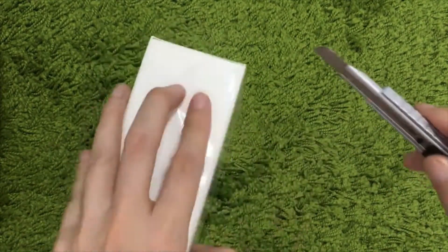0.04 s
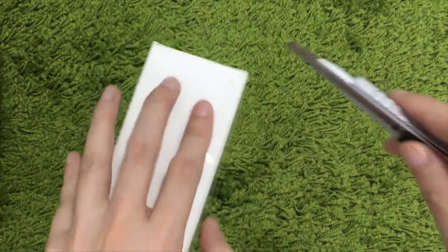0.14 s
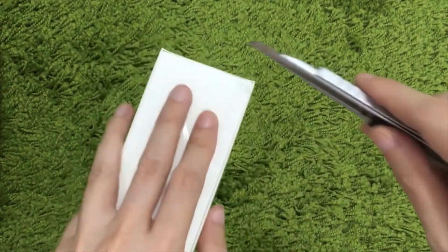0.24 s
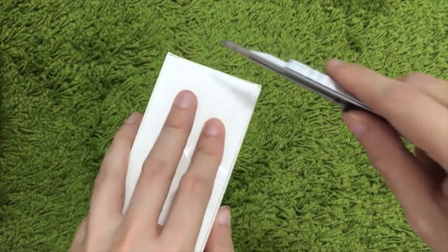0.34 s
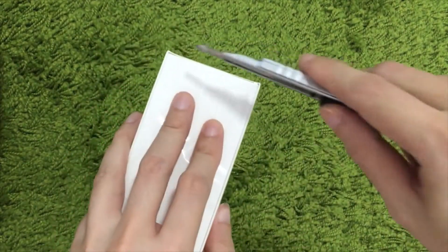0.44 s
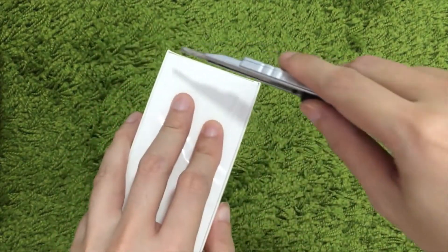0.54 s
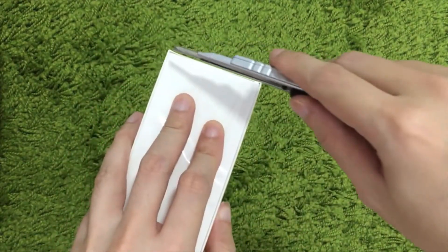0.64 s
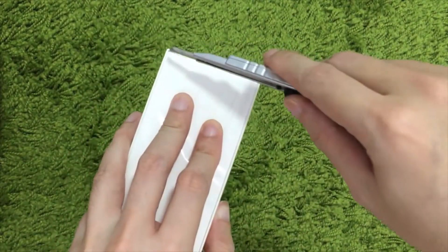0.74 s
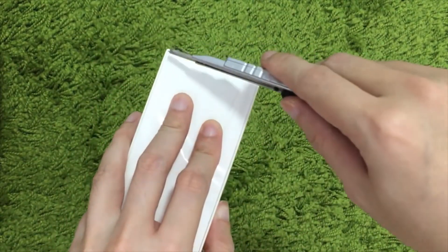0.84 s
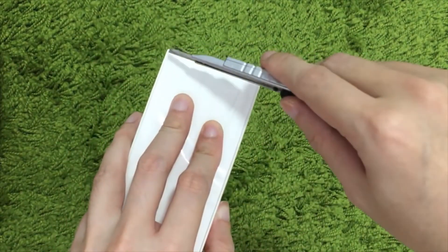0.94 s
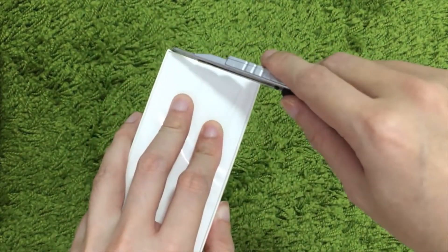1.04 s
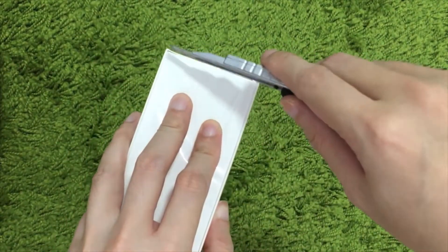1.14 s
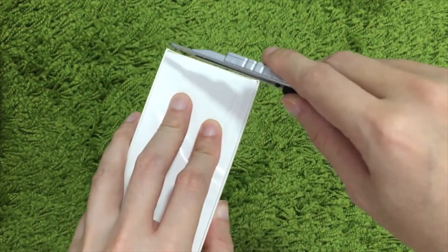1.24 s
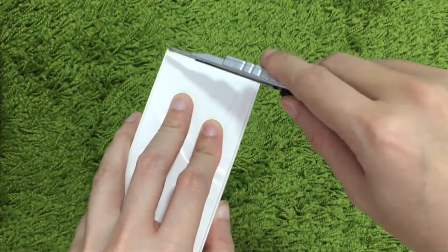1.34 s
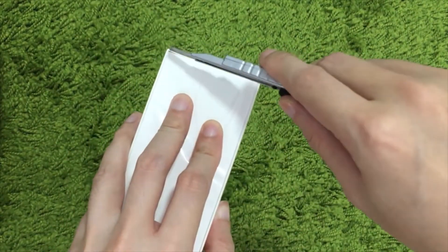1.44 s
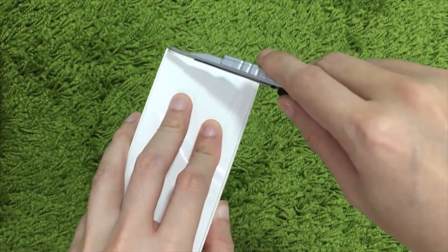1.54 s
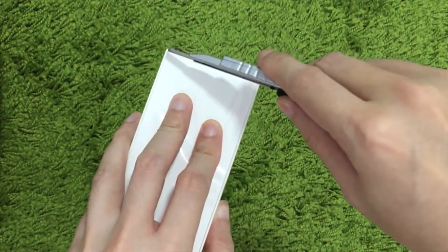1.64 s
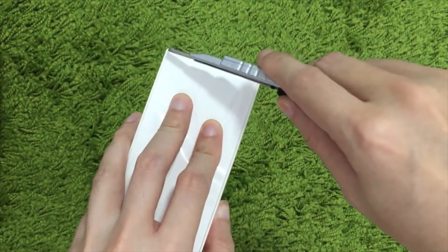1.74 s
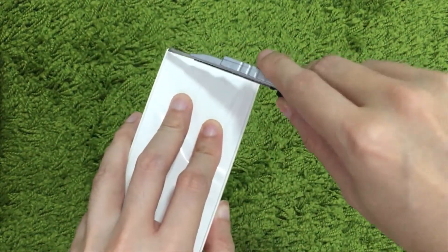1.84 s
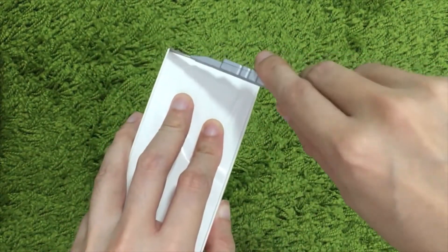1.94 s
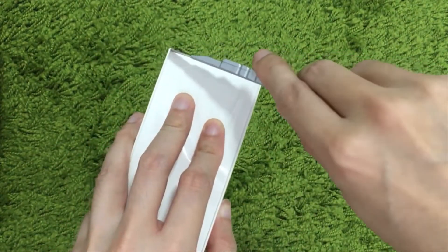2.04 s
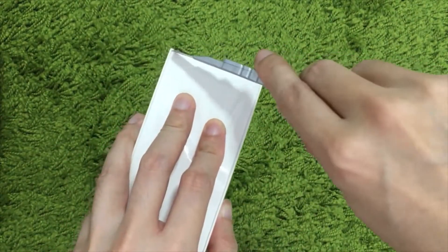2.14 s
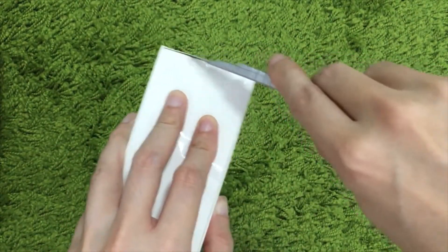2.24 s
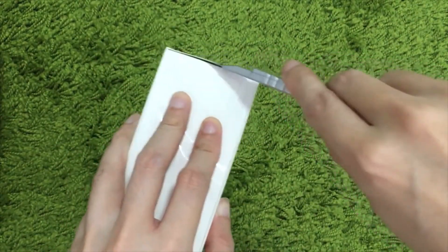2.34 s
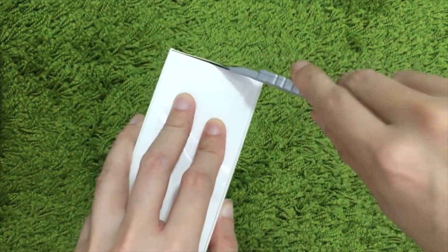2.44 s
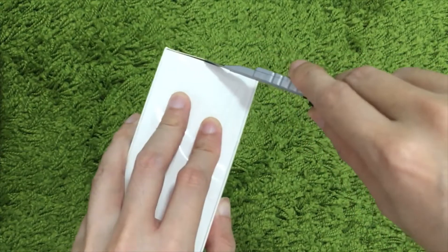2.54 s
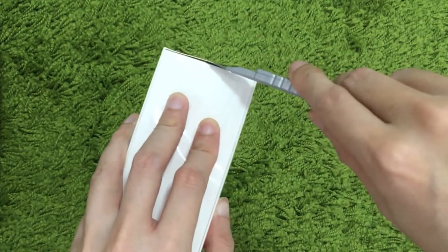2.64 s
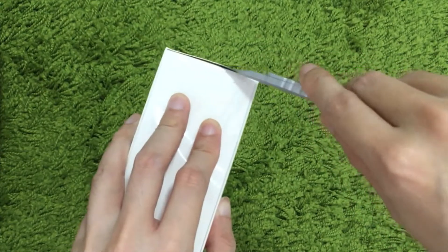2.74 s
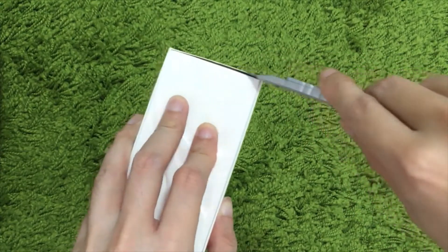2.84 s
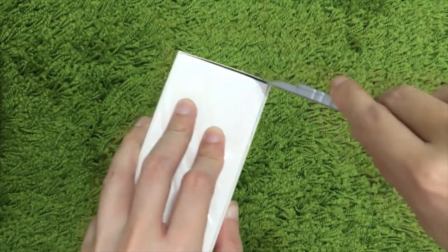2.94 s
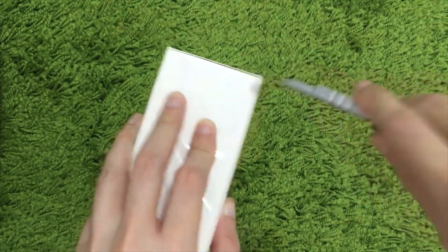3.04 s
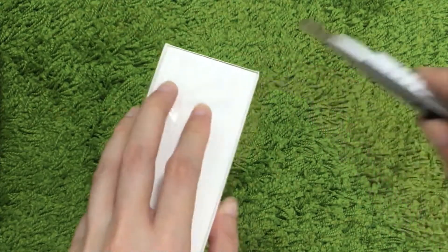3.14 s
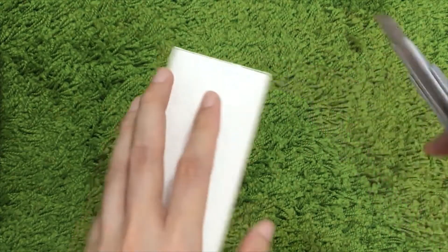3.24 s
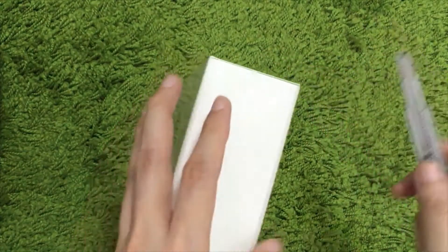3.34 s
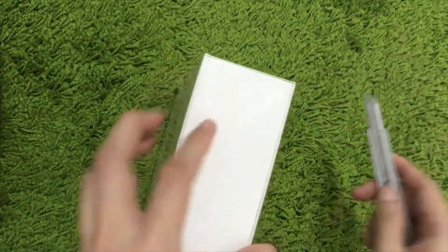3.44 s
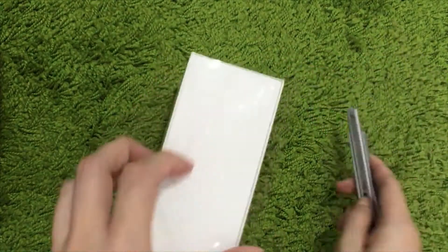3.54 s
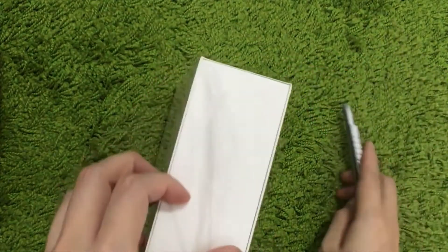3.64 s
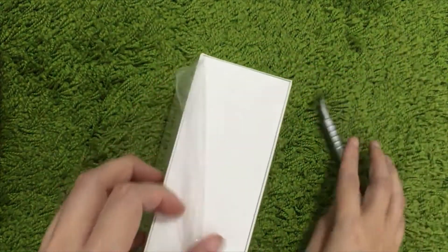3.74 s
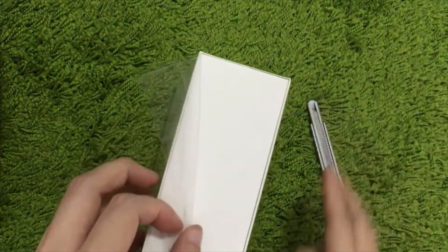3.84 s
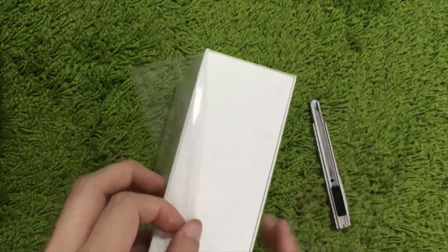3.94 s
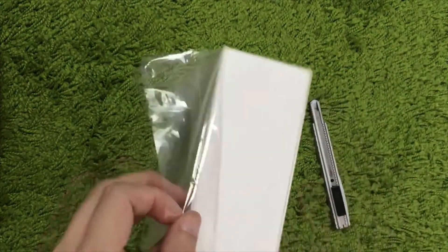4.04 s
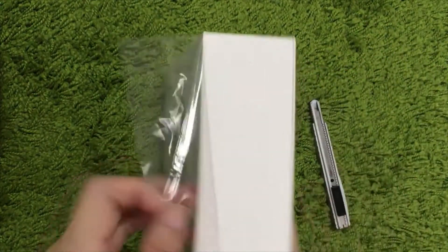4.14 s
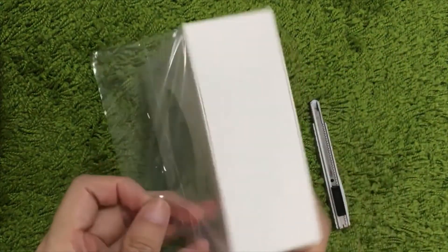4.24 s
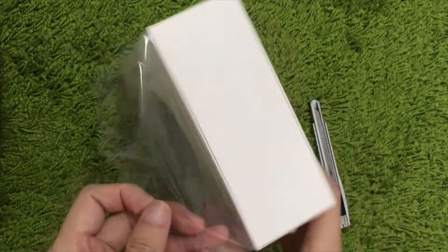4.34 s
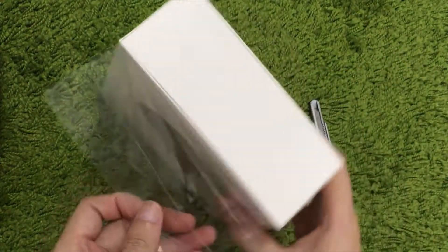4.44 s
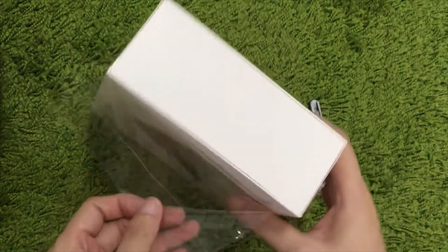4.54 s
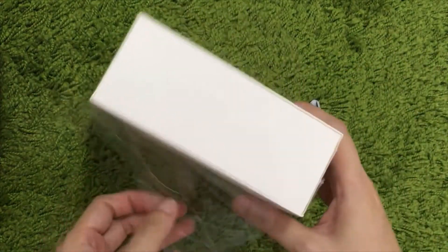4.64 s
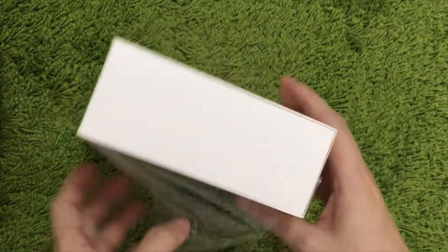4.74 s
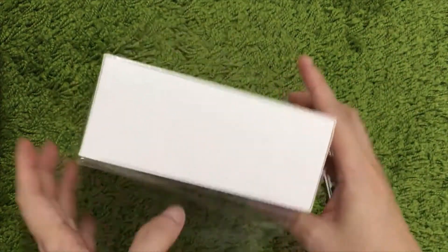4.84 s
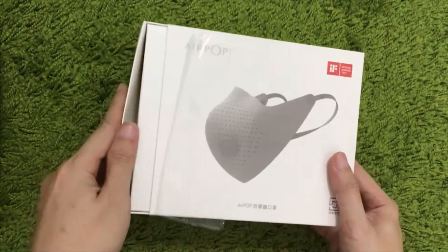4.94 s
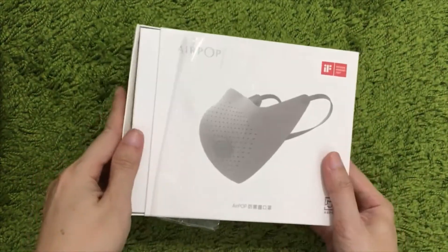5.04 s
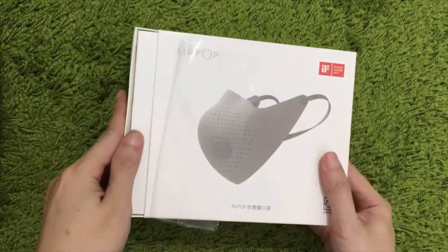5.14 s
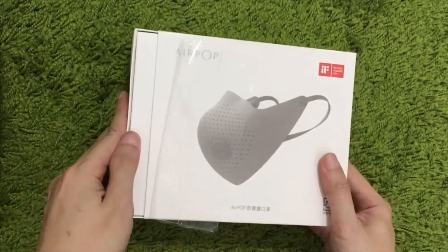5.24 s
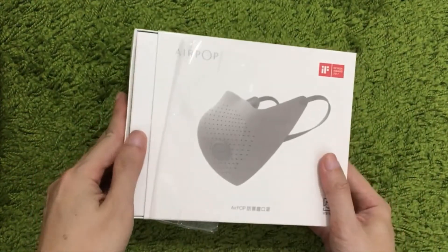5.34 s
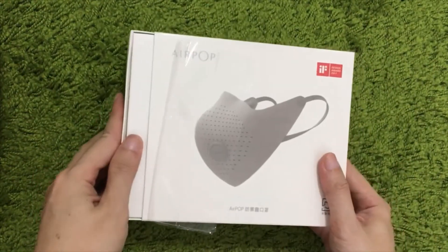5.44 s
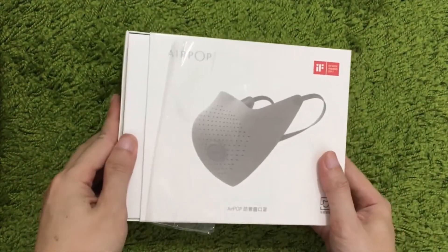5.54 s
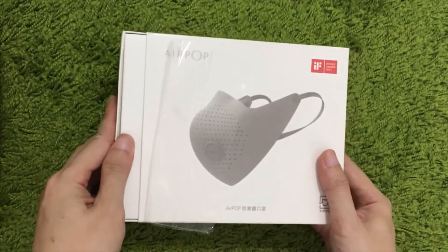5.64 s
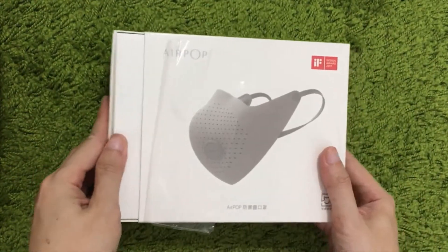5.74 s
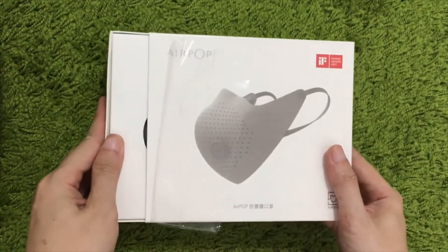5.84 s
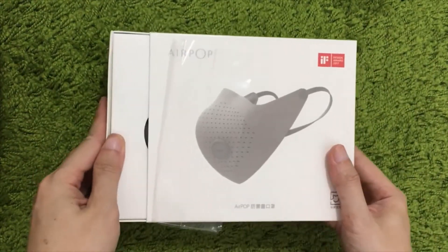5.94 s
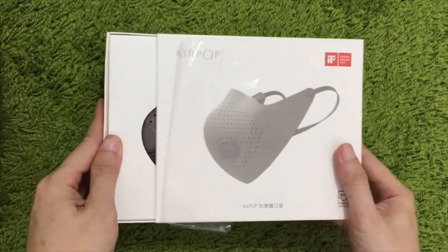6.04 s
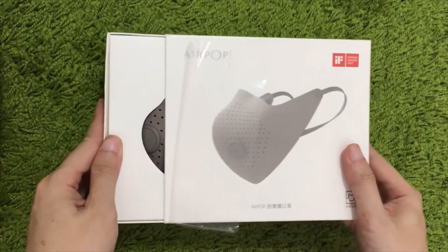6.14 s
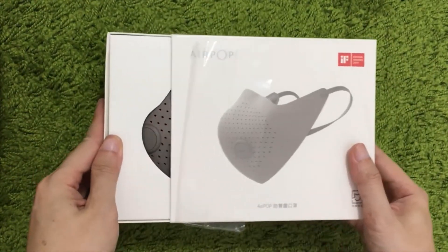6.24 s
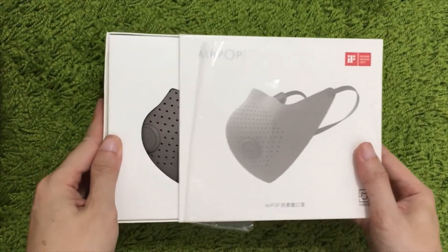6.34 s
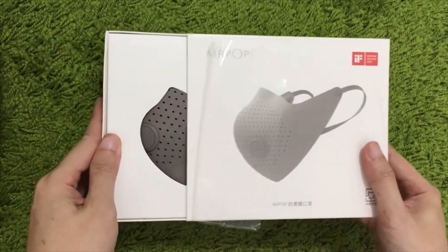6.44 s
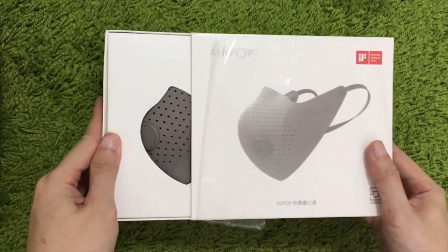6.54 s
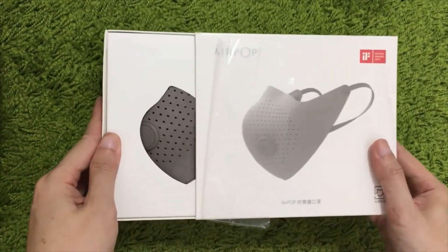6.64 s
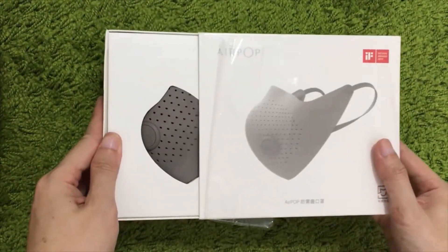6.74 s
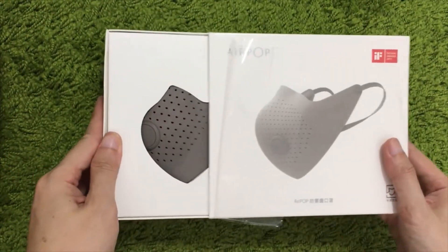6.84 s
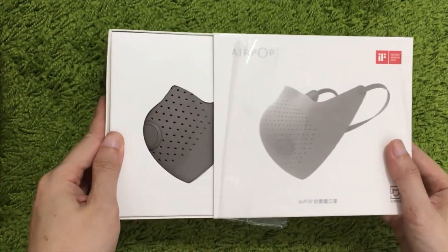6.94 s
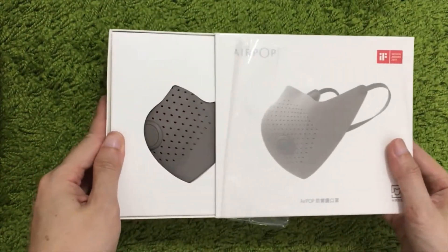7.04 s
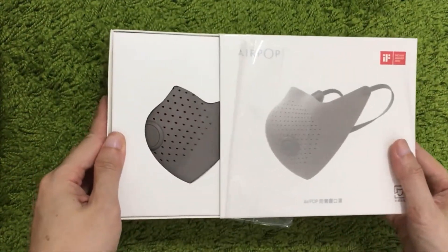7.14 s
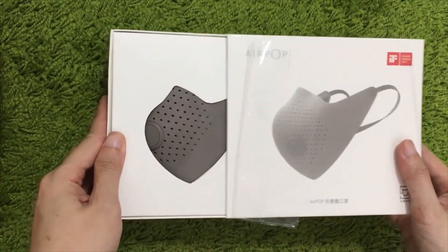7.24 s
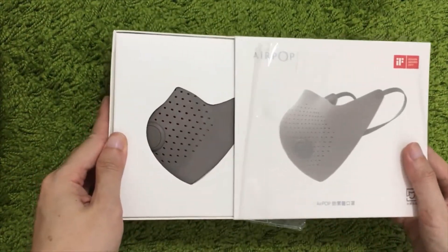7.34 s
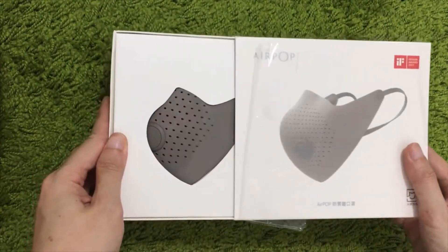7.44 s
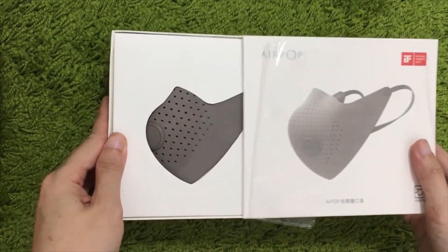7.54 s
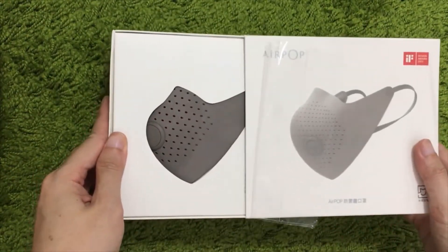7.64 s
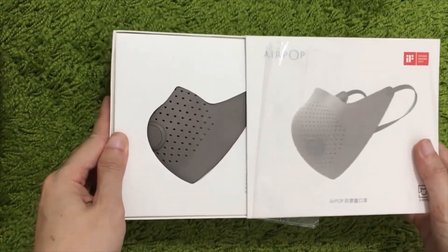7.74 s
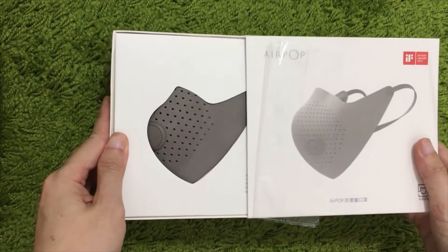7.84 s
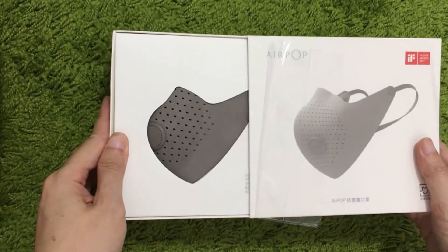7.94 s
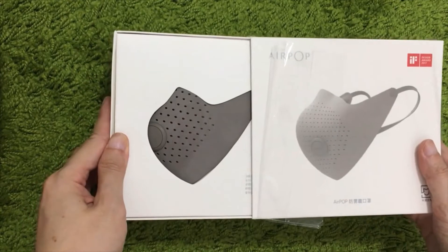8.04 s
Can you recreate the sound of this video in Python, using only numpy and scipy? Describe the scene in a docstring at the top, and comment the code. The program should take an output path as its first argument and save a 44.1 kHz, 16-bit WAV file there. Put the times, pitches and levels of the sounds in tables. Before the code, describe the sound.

A utility knife slits plastic wrap on a small box, its blade ratchets sharply, film crackles off, and the card tray slides out in soft pulls.

```python
"""A crisp snap of plastic film over a dull box knock comes first: hands slit the shrink film of a small card box
with a snap-blade knife, ratchet the blade back, peel the film and slide the tray out in short pulls,
on a rug in a quiet room. Traffic rumble, a motor hum, a low tone and two bird chirps come in from outside.
Clicks, snaps and knocks are noise bursts driving damped modes; rubbing and sliding are shaped noise;
squeaks and rasps are narrow noise; bird, motor and low tone are sines."""
import sys
import numpy as np
from scipy import signal
from scipy.fft import rfft, irfft, next_fast_len
from scipy.io import wavfile

SR = 44100
rng = np.random.default_rng(int(sys.argv[2]) if len(sys.argv) > 2 else 0)


def attenuation_scalar(level_db):
    """Turn a level in dB into a linear amplitude multiplier (20 dB per decade)."""
    decades = np.asarray(level_db, float) / 20
    return 10 ** decades


def transcribe(u):
    """Save the signal u as a 16-bit wav file named by the first command-line argument.

    u: samples, shape (n,) or (channels, n), limited to [-1, 1]; the rate is SR.
    q: integer samples, one column per channel.
    """
    v = np.clip(np.atleast_2d(u).T, -1, 1)
    q = np.round(v * 32767).astype(np.int16)
    wavfile.write(sys.argv[1], SR, q)


N = 356769  # length of the scene [samples]


# clicks of the knife's slider and blade: (time [s], shell peak level [dB], favoured ring [Hz])
KNIFE_CLICKS = [(0.9715, -34.5, 2760), (1.0994, -48, 2190), (1.8462, -40.5, 4500), (1.8636, -61, 2720),
                (1.9099, -30.5, 3900), (1.9386, -49, 4360), (2.4013, -50.5, 3220), (2.5243, -53, 4390),
                (2.549, -53, 2560), (3.0105, -32.5, 2750), (3.259, -47.5, 6070), (3.3905, -16, 5470),
                (3.3992, -16.5, 2750), (3.409, -17, 5880), (3.4179, -14, 2700), (3.4268, -13, 6990),
                (3.4357, -15, 6050), (3.4487, -16.5, 2724), (3.472, -15.5, 5800), (3.4959, -17.5, 5900),
                (3.512, -16, 6400), (3.69, -30.5, 2300)]
# ringing of the knife's shell: (frequency [Hz], relative level [dB], T60 [s])
SHELL_MODES = [(2200, -17.5, 0.017), (2755, -1.5, .016), (3180, -3, 0.021), (3900, -5, 0.003),
               (4540, 3.5, 0.0086), (5280, -0.5, 0.0046), (5500, -3.5, 0.01), (5800, 0.5, 0.016),
               (6290, -10, .007), (6400, -15, 0.0077)]
# ringing of the blade: (frequency [Hz], gain on the tick [dB], T60 [s])
BLADE_MODES = [(8900, -16.5, .005), (9500, -15, .005), (11600, -12.5, .004), (13300, -10, .006),
               (14700, -11.5, .004)]
# harder clicks are brighter and shorter; TICK_DB and RATTLE_MS hold for a click of -16 dB
TICK_DB, TICK_PER_DB = -13.5, 1.84
RATTLE_MS, RATTLE_MS_PER_DB = 0.59, -0.04


def knife():
    """Each detent rattles briefly: the shell's damped modes ring under a dry bright tick of the blade."""
    out = np.zeros(N)
    rattles = clusters(len(KNIFE_CLICKS), spiky_db=3.5)
    strengths = rng.normal(0, 2.0, (len(KNIFE_CLICKS), len(SHELL_MODES)))
    for (s, shell_db, centre_hz), rattle, own_db in zip(KNIFE_CLICKS, rattles, strengths):
        harder_db = shell_db + 16
        blow = rattle * fade(RATTLE_MS + RATTLE_MS_PER_DB * harder_db)
        rung = 0
        for (hz, db, t60), chance_db in zip(SHELL_MODES, own_db):
            mode_db = db + chance_db + favour(hz, centre_hz, lift_db=13.0)
            rung = rung + attenuation_scalar(mode_db) * rms_one(ring(blow, hz, t60))
        shell = band(rung + attenuation_scalar(3.0) * rms_one(blow), 1800, 7000)
        add(out, s, band(shell, 1800, 16500), shell_db)

        tick = band(blow, 7000, 16500)
        blade = sum(attenuation_scalar(db) * ring(tick, hz, t60) for hz, db, t60 in BLADE_MODES)
        add(out, s, tick + blade, TICK_DB + TICK_PER_DB * harder_db)
    return out


# faint squeaks and rasps of blade and card: (start [s], end [s], frequency [Hz], level at the middle [dB])
SQUEAKS_AND_RASPS = [(0.324, .47, 3170, -76.5), (1.79, 1.923, 6330, -73.5), (2.39, 2.438, 5500, -71),
                     (2.46, 2.513, 5470, -76), (2.583, 2.68, 6270, -73), (2.693, 2.772, 1810, -59),
                     (2.677, 2.774, 3220, -66), (2.78, 2.87, 5550, -68), (3.608, 3.7, 1190, -63),
                     (5.987, 6.028, 3280, -57)]


def squeaks_and_rasps():
    """Blade and card squeak and rasp faintly: noise twice through a narrow resonance."""
    out, t, white = np.zeros(N), np.arange(N) / SR, rng.standard_normal(N)
    for start, end, hz, db in SQUEAKS_AND_RASPS:
        swell = np.sin(np.pi * np.clip((t - start) / (end - start), 0, 1))
        once = ring(white, hz, .006)
        out += attenuation_scalar(db) * swell * rms_one(ring(once, hz, .006))
    return out


# single snaps of the film, and ticks of the card once the tray slides:
# (time [s], peak level of the bright part [dB], card-coloured low part relative to it [dB], brightness [Hz])
TIMED_SNAPS = [(0.0165, -24, -4.5, 5950), (0.0882, -39.5, -5.5, 15500), (0.2092, -34.5, -36, 14500),
               (0.2466, -43.5, -11, 8640), (2.156, -41, -22, 14800), (2.166, -35, -15, 15100),
               (2.1924, -22.5, -14, 5900), (2.1965, -25.5, -7.5, 11600), (2.2268, -28, -12, 12800),
               (2.2284, -30, -3, 4310), (2.2377, -25, -6, 12200), (2.2426, -36.5, 7.5, 6380),
               (2.7087, -44, -12, 5940), (2.7272, -54, -8, 5990), (2.7444, -56, -12, 5970),
               (2.7548, -43, -1, 6580), (2.7795, -13, -11.5, 5800), (2.8325, -34.5, -31, 14700),
               (2.9964, -46, 3, 15200), (3.0244, -35, -21, 12400), (3.04, -35, -28, 12800),
               (3.0779, -28.5, -34, 13600), (3.0924, -35, -30, 14500), (3.115, -40, -26, 14900),
               (3.1384, -34, -30, 14100), (3.1647, -32, -10, 11100), (3.1714, -44, -10, 11400),
               (3.2055, -32.5, -11, 13300), (3.2222, -30.5, -11.5, 11700), (3.307, -43.5, -10, 15400),
               (3.329, -35, -8.5, 8280), (3.3587, -47.5, -3, 9310), (3.5759, -14, -36, 13800),
               (3.6556, -38, -9, 6330), (3.6949, -19, -21, 15700), (3.7237, -23.5, -17, 8610),
               (3.7346, -16.5, -20.5, 9150), (3.806, -23, -31, 8100), (3.8162, -27, -28, 6990),
               (3.906, -28.5, -22, 6410), (3.9345, -27, -19, 6480), (3.956, -23, -17, 4120),
               (3.9657, -30.5, -10, 12300), (3.9711, -18.5, -12.5, 13400), (3.9814, -12, -13.5, 12000),
               (4.0024, -33.5, -2, 6060), (4.0372, -39, -6, 5730), (4.0978, -27, -28, 15100),
               (4.1128, -9, -11.5, 9700), (4.1224, -25, -7, 8270), (4.14, -25, -16, 9430),
               (4.162, -23, -21, 12100), (4.2247, -42, 1, 5750), (4.2463, -30, -7, 9290),
               (4.2782, -35, -8, 5710), (4.3008, -27.5, -4.5, 9010), (4.3141, -27, -13, 8020),
               (4.3314, -17.5, -14.5, 5620), (4.3404, -39, -26, 14700), (4.353, -25, -19, 14700),
               (4.3799, -22.5, -31, 15400), (4.385, -36, -23, 9840), (4.4097, -36.5, -12, 6640),
               (4.4518, -56, -15, 13400), (4.4887, -43.5, 1, 4470), (4.6044, -39, -21, 4000),
               (4.6941, -26.5, -7, 5660), (4.756, -33, -8, 6540), (4.764, -46, -7, 15200),
               (4.776, -50, -11, 9390), (4.7884, -43, -14.5, 7170), (4.8269, -46.5, -7.5, 4230),
               (4.9434, -48, -3, 7160), (4.9714, -47.5, -2, 6150), (5.704, -37.5, -4.5, 4010),
               (5.7289, -33.5, -7, 5690), (5.9553, -39, -14.5, 12500), (7.6011, -42, -18.5, 15100),
               (7.8156, -58, -4, 4430)]
# the card flap under the film rings: (frequency [Hz], level relative to the low part [dB], T60 [s])
FLAP_MODES = [(1894, -8.5, 0.0048), (3300, -3.5, 0.0035)]
SNAP_MS, SNAP_SPREAD = .5, .25  # typical length of a -30 dB snap, random spread of its natural log
SHORTER_PER_DB = .025  # louder snaps are briefer: drop in log length per dB
EVEN_HZ, TILT_DB_PER_OCTAVE = 8600, 9  # brightness at which both bright bands peak alike


def snaps_and_ticks():
    """Film creases and card let go in bursts of cracks; the low part of each lasts longer than the high."""
    snaps = list(TIMED_SNAPS) + random_snaps()
    out, cracks = np.zeros(N), clusters(len(snaps), spiky_db=10.5)
    above_db = np.array(snaps)[:, 1] + 30
    chance = SNAP_SPREAD * rng.standard_normal(len(snaps))
    lengths_ms = SNAP_MS * np.exp(chance - SHORTER_PER_DB * above_db)
    for (s, db, low_db, bright_hz), crack, ms in zip(snaps, cracks, lengths_ms):
        low = rms_one(band(crack * fade(3.85 * ms), 1500, 4000))
        flap = sum(attenuation_scalar(g) * rms_one(ring(low, hz, t60)) for hz, g, t60 in FLAP_MODES)
        add(out, s, low + flap, db + low_db)

        # a bright snap is weaker in its middle, a dull one in its top
        tilt_db = TILT_DB_PER_OCTAVE * np.log2(bright_hz / EVEN_HZ)
        burst = crack * fade(ms)
        add(out, s, band(burst, 5300, 10490), db - max(tilt_db, 0))
        add(out, s, band(burst, 9040, 15000), db + min(tilt_db, 0))
    return out


RANDOM_SNAPS = 45  # how many
SNAP_OVER_RUSTLE_DB = 8.5  # least peak above the crinkle gain
RANDOM_LOW_DB = -6.5  # average low part relative to the bright part


def random_snaps():
    """Further snaps at random times, the more often and the louder the louder the rustle is."""
    crinkle, draw = rubbing()[0], rng.random((RANDOM_SNAPS, 4))
    busy = np.cumsum(np.sqrt(crinkle))
    i = np.searchsorted(busy, draw[:, 0] * busy[-1])
    db = 20 * np.log10(crinkle[i] + 1e-9) + SNAP_OVER_RUSTLE_DB + 12 * draw[:, 1]
    low_db = RANDOM_LOW_DB + 16 * (draw[:, 2] - .5)
    bright_hz = EVEN_HZ * 2 ** (1.4 * (draw[:, 3] - .5))
    return list(zip(i / SR, db, low_db, bright_hz))


def rustle():
    """Rustling hiss with clumps of fine crackles in it; card scuffs low, film crinkles high."""
    sizes = attenuation_scalar(12.0 * np.minimum(rng.exponential(1, N), 4)) * rng.choice([-1, 1], N)
    per_second = 900 * attenuation_scalar(5.0 * drift(25))
    crackle = sizes * (rng.random(N) < per_second / SR)
    hiss = rng.standard_normal(N) * attenuation_scalar(2.5 * drift(36))
    grain = hiss + attenuation_scalar(-3.5) * rms_one(crackle)
    scuff = rms_one(band(grain, 330, 4200))
    crinkle = rms_one(band(grain, 7700, 19845))
    crinkle_gain, scuff_gain = rubbing()
    return scuff_gain * scuff + crinkle_gain * crinkle


# film and fingers rubbing; the burst at 3.46 s is the knife's ratchet rattling out:
# (start [s], hold [s], film crinkle level [dB], card scuff relative to it [dB])
RUSTLE_BURSTS = [(0.073, .23, -73, -2.5), (2.149, .025, -61.5, -7), (2.189, .015, -55, -12),
                 (2.223, .028, -53.5, 2.5), (2.261, .04, -71.5, -3), (2.599, 0.35, -75.5, 1),
                 (2.71, .06, -63.5, 0), (2.987, .22, -57, -7.5), (3.269, 0.11, -77, 8),
                 (3.459, .05, -44, -15), (3.546, .03, -59, -20), (3.659, .23, -58.5, -3),
                 (3.931, .07, -47.5, -4), (4.098, .07, -54.5, 0), (4.2, .25, -59, -4), (4.45, .27, -63, -3),
                 (4.741, .04, -52, -3), (4.82, .13, -76, 6), (4.96, .4, -82, 0.1)]
RUB_RISE_DB_PER_S, RUB_FALL_DB_PER_S = 902, 999.5


def rubbing():
    """Gains of the rustle's high crinkle and low scuff, summed over its bursts."""
    crinkle_gain, scuff_gain = np.zeros(N), np.zeros(N)
    for start, hold, db, scuff_db in RUSTLE_BURSTS:
        gain = attenuation_scalar(stroke_db(start, hold, db, RUB_RISE_DB_PER_S, RUB_FALL_DB_PER_S))
        crinkle_gain += gain
        scuff_gain += gain * attenuation_scalar(scuff_db)
    return crinkle_gain, scuff_gain


# dull knocks on the hollow box: (time [s], peak level [dB], favoured ring [Hz], lift of the upper modes [dB])
BOX_KNOCKS = [(0.015, -30, 273, -4), (1.85, -45.5, 143, -24), (1.91, -43, 184, -23),
              (2.198, -34.5, 312, -3), (2.227, -42, 159, 1), (2.248, -35, 145, -4),
              (2.781, -28.5, 190, -3.5), (2.8, -37, 231, -8), (3.476, -39, 234, -11),
              (3.52, -38.5, 229, -16), (3.723, -50, 234, -1), (3.956, -38, 178, -9),
              (3.979, -35.5, 251, -7), (4.027, -38.5, 145, 0), (4.112, -29.5, 614, -1),
              (4.124, -34, 540, -2), (4.142, -31.5, 236, 1), (4.245, -35, 270, 1), (4.296, -35.5, 336, 12),
              (4.348, -37.5, 234, 6.5), (4.49, -43, 336, 0), (4.823, -36.5, 143, -8.5),
              (4.945, -38, 143, -2.5), (5.003, -32, 227.6, -7.5), (5.702, -41, 218, -25),
              (6.165, -37, 227, 0)]
# ringing of the box: (frequency [Hz], relative level [dB], T60 [s])
BOX_MODES = [(149, -5.5, 0.15), (184, -6, 0.049), (227, -2.5, 0.047), (280.7, -3.5, 0.087),
             (335, 2.5, 0.028), (365.7, -2.5, 0.078), (483, -10, 0.09), (620, 2.5, 0.013),
             (800, -1.5, 0.0075), (965, 1.5, 0.023), (1243, -5.5, 0.03), (1538, -20.5, 0.012),
             (1950, -4.5, 0.005)]


def box_knocks():
    """A soft push of a few milliseconds into the modes of the hollow box; each knock weights the upper ones."""
    out, pushes = np.zeros(N), rng.standard_normal((len(BOX_KNOCKS), 4400))
    strengths = rng.normal(0, 2.5, (len(BOX_KNOCKS), len(BOX_MODES)))
    for (s, peak_db, centre_hz, upper_db), push, own_db in zip(BOX_KNOCKS, pushes, strengths):
        blow = push * fade(3.28, size=4400)
        rung = 0
        for (hz, db, t60), chance_db in zip(BOX_MODES, own_db):
            mode_db = db + chance_db + favour(hz, centre_hz, lift_db=12.5) + upper_db * (hz > 450)
            rung = rung + attenuation_scalar(mode_db) * rms_one(ring(blow, hz, t60))
        add(out, s, rung, peak_db)
    return out


# the tray slides in its sleeve, one row a pull: (start [s], hold [s], gain [dB])
TRAY_PULLS = [(5.07, .55, -72), (5.706, 0.039, -53.5), (5.947, 0.099, -58.5), (6.03, .15, -62),
              (6.24, .16, -60), (6.42, .15, -66.5), (6.577, .03, -61), (6.99, .17, -69),
              (6.747, 0.075, -57), (7.046, .005, -59.5), (7.177, 0.074, -56), (7.455, 0.059, -56.5),
              (7.916, 0.0048, -58.5), (8.085, .005, -60)]
# colour of card on card: (frequency [Hz], relative density [dB per Hz])
CARD_SPECTRUM = [(240, -11), (400, -1), (553, -12), (626, -3), (1380, -5), (1760, -7.5), (2250, 4),
                 (2840, -3.5), (3260, -2), (14400, -14.5), (16000, -9)]
# resonances of the hollow sleeve: (frequency [Hz], typical gain [dB], T60 [s])
SLEEVE_MODES = [(1510, -14, 0.026), (2120, -13, 0.0044), (3400, -17.5, 0.004), (5220, -28.5, 0.0055)]
PULL_RISE_DB_PER_S, PULL_FALL_DB_PER_S = 271, 310


def sliding_tray():
    """Card on card: a fibrous hiss; the hollow sleeve's resonances swell and fade as the tray moves."""
    hiss = coloured(rng.standard_normal(N), CARD_SPECTRUM) * attenuation_scalar(1.34 * drift(49))
    hollow = sum(attenuation_scalar(db + 4.0 * drift(15)) * rms_one(ring(hiss, hz, t60)) for hz, db, t60 in SLEEVE_MODES)
    pulls_db = [stroke_db(*pull, PULL_RISE_DB_PER_S, PULL_FALL_DB_PER_S) for pull in TRAY_PULLS]
    return attenuation_scalar(np.max(pulls_db, axis=0)) * (hiss + hollow)


# when the bird sings: (time [s], call level before flutter [dB])
BIRD_CALLS = [(4.955, -69.5), (5.3, -68)]
# shape of one call: (time after its start [s], frequency [Hz], relative level [dB])
CALL_SHAPE = [(0, 3780, -6), (.03, 3560, -1), (.06, 3110, 0), (.095, 2720, -6), (.12, 2370, -2),
              (.14, 2200, -6), (.165, 1950, -18)]


def bird():
    """Falling whistles of a fluttering sine, smeared by the echo of far walls."""
    calls = np.zeros(N)
    for s, db in BIRD_CALLS:
        rows = [(s + after, hz, db + shape_db) for after, hz, shape_db in CALL_SHAPE]
        calls += inside(rows) * tone(*in_time(rows))
    calls = calls * attenuation_scalar(4.5 * drift(70))
    return calls + attenuation_scalar(-1.5) * room(calls, .28)


SWELL_RISE_DB_PER_S, SWELL_FALL_DB_PER_S = 150, 178  # for motor and low tone

# far motor, one row a swell: (start [s], hold [s], frequency [Hz], level before wavering [dB])
MOTOR_SWELLS = [(0.219, 0.52, 45.97, -50), (4.813, .06, 41.3, -40.5), (4.95, 0.39, 44.9, -49.5),
                (5.72, 1.33, 42.66, -44.5)]


def motor():
    """A far motor hums as a low sine, steady in pitch within a swell and wavering slowly in level."""
    hum = np.zeros(N)
    for start, hold, hz, db in MOTOR_SWELLS:
        level_db = stroke_db(start, hold, db, SWELL_RISE_DB_PER_S, SWELL_FALL_DB_PER_S)
        hum += tone(np.full(N, hz), level_db)
    return hum * attenuation_scalar(1.3 * drift(2.5))


# swells of the low tone: (start [s], hold [s], level [dB])
TONE_SWELLS = [(0.575, 0.16, -55), (1.745, 0.016, -62), (2.127, 0.016, -61.5), (3.728, 0.045, -58.5)]
TONE_HZ = 233


def low_tone():
    """A sine of one pitch that comes and goes; the strongest swell sets its level."""
    swells_db = [stroke_db(*swell, SWELL_RISE_DB_PER_S, SWELL_FALL_DB_PER_S) for swell in TONE_SWELLS]
    return tone(np.full(N, TONE_HZ), np.max(swells_db, axis=0))


# room air, street and microphone hiss: (frequency [Hz], relative density [dB per Hz])
AIR_SPECTRUM = [(18, -41.5), (30, 1), (90, -10.5), (156, -20.5), (231, -21), (264, -29.5), (325, -29.5),
                (412, -34), (521, -34), (814, -39), (1030, -36), (1690, -44), (1830, -43.5), (4960, -56),
                (15700, -57.5)]
# swelling of the street rumble: (time [s], gain on the low part of the air [dB])
RUMBLE_GAIN = [(0.0, -67), (0.45, -63), (0.75, -53.5), (1.7, -48.5), (2.45, -52), (3.05, -56), (3.6, -63),
               (4.0, -48), (4.7, -58), (5.6, -50.5), (6.0, -59.5), (7.0, -55), (8.09, -46.5)]
# resonances of the room in the air: (frequency [Hz], relative level [dB], T60 [s])
AIR_MODES = [(93.14, -9, 0.92), (130.2, -9.5, 0.23), (195.4, -14.5, 0.18), (341, -22.5, .2),
             (1054, -27.5, 0.018)]
AIR_DB = -47.5  # gain on the steady part


def air_and_rumble():
    """Coloured noise: its upper part and the room's modes stay steady, its low part swells as traffic rumble."""
    air = coloured(rng.standard_normal(N), AIR_SPECTRUM)
    low = signal.sosfilt(signal.butter(2, 220, fs=SR, output="sos"), air)
    modes = sum(attenuation_scalar(db) * rms_one(ring(air, hz, t60)) for hz, db, t60 in AIR_MODES)
    steady = attenuation_scalar(AIR_DB) * (air - low + modes)
    rumble = attenuation_scalar(in_time(RUMBLE_GAIN)[0]) * low
    return steady + rumble


def room(x, t60):
    """Diffuse tail: noise that dies, after a short gap."""
    t = np.arange(SR // 2) / SR
    tail = rng.standard_normal(len(t)) * attenuation_scalar(-60 * t / t60) * (t > .003)
    tail = signal.lfilter([1, .3], [1], tail)  # slightly duller
    return signal.fftconvolve(x, tail / np.sqrt(np.sum(tail ** 2)))[:N]


def clusters(count, spiky_db, size=2200):
    """Uneven micro-cracks, one row an event; loud ones are rare."""
    draw = rng.random((count, 2 * size))
    heights = attenuation_scalar(-spiky_db * np.log(1 - .995 * draw[:, :size]))
    return heights * np.sign(draw[:, size:] - .5)


def fade(length_ms, size=2200):
    """A cluster swells for a moment, thins out and leaves a weaker trail."""
    t = np.arange(size) / SR * 1000 / max(length_ms, .1)  # in lengths
    return (1 - np.exp(-1.8 * t)) * (np.exp(-t) + attenuation_scalar(-25) * np.exp(-t / 9.4))


def ring(clicks, hz, t60):
    """Damped resonance: a unit click sets a sine of height 1 ringing."""
    r, w = attenuation_scalar(-60 / (t60 * SR)), 2 * np.pi * hz / SR
    return signal.lfilter([0, np.sin(w)], [1, -2 * r * np.cos(w), r * r], clicks)


def favour(hz, centre_hz, lift_db):
    """Where a thing is struck decides which modes sound most: lift in dB near the favoured pitch."""
    return lift_db * np.exp(-(np.log2(hz / centre_hz) / 0.18) ** 2)


def stroke_db(start, hold, db, rise, fall):
    """Level of one movement: it rises, holds and falls at steady dB per second."""
    t = np.arange(N) / SR
    return db - rise * np.maximum(start - t, 0) - fall * np.maximum(t - start - hold, 0)


def tone(hz, level_db):
    """A sine at the given rms level."""
    return np.sqrt(2) * attenuation_scalar(level_db) * np.sin(2 * np.pi * np.cumsum(hz) / SR)


def drift(rate):
    """Slow chance of spread 1: noise smoothed at about the given rate in Hz."""
    r = np.exp(-2 * np.pi * rate / SR)
    return rms_one(signal.lfilter([1], [1, -2 * r, r * r], rng.standard_normal(N + SR))[SR:])


def coloured(white, spectrum):
    """Give a signal the spectrum, at unit power."""
    size = next_fast_len(N)
    hz = np.maximum(np.arange(size // 2 + 1) * SR / size, 1)
    points = np.array(spectrum)
    shape = attenuation_scalar(np.interp(np.log(hz), np.log(points[:, 0]), points[:, 1], left=-90))
    return rms_one(irfft(rfft(white, size) * shape, size)[:N])


def band(x, low_hz, high_hz):
    """Causal band-pass."""
    return signal.sosfilt(signal.butter(2, [low_hz, high_hz], "band", fs=SR, output="sos"), x)


def rms_one(x):
    """Scale to unit power."""
    return x / np.sqrt(np.mean(x ** 2) + 1e-20)


def in_time(rows):
    """Columns joined by straight lines, one value a sample."""
    s, *columns = np.transpose(rows)
    return [np.interp(np.arange(N) / SR, s, c) for c in columns]


def inside(rows):
    """One while the table lasts, with 20 ms fades before and after."""
    t = np.arange(N) / SR
    return np.clip(np.minimum(t - rows[0][0], rows[-1][0] - t) / .02 + 1, 0, 1)


def add(out, s, sound, peak_db):
    """Mix a short sound in at its moment with the given peak."""
    i = round(s * SR)
    out[i:i + len(sound)] += (attenuation_scalar(peak_db) * sound / np.abs(sound).max())[:N - i]


ROOM_T60_S, ROOM_DB = 0.2, -16


def scene():
    """Close handling with its room tail, over the outside sounds and the air."""
    hands = knife() + squeaks_and_rasps() + snaps_and_ticks() + rustle() + box_knocks() + sliding_tray()
    background = bird() + motor() + low_tone() + air_and_rumble()
    return (hands + attenuation_scalar(ROOM_DB) * room(hands, ROOM_T60_S) + background)[None]


def roll_off(x):
    """The treble ends steeply here."""
    return signal.sosfilt(signal.butter(12, 17000, fs=SR, output="sos"), x)


# shallow dips of the microphone: (frequency [Hz], width [Hz], share of the band removed [0..1])
MICROPHONE_DIPS = [(4870, 890, 0.25), (10450, 910, 0.31)]
LOW_CUT_HZ, TOP_CUT_HZ = 33, 15950  # stopband edges


def record(dry):
    """A phone microphone with two shallow dips and steep cuts at both ends."""
    for hz, width_hz, share in MICROPHONE_DIPS:
        dry = dry - share * band(dry, hz - width_hz / 2, hz + width_hz / 2)
    dry = signal.sosfilt(signal.cheby2(6, 30, LOW_CUT_HZ, "high", fs=SR, output="sos"), dry)
    mix = signal.sosfilt(signal.cheby2(12, 20, TOP_CUT_HZ, fs=SR, output="sos"), dry)
    return roll_off(mix)


dry = scene()
out = record(dry)
transcribe(out)
```